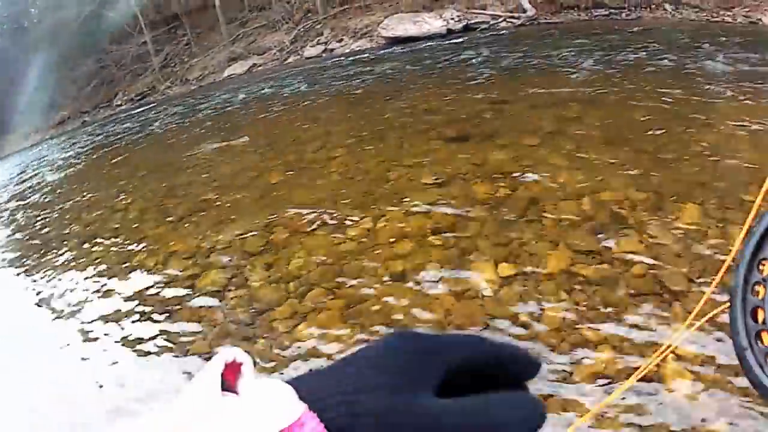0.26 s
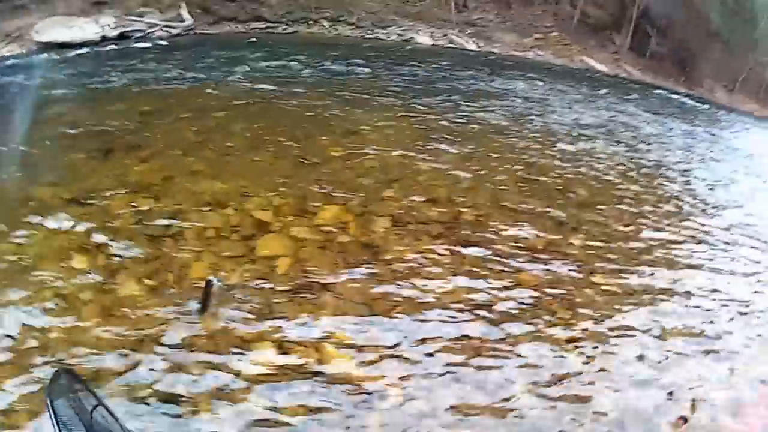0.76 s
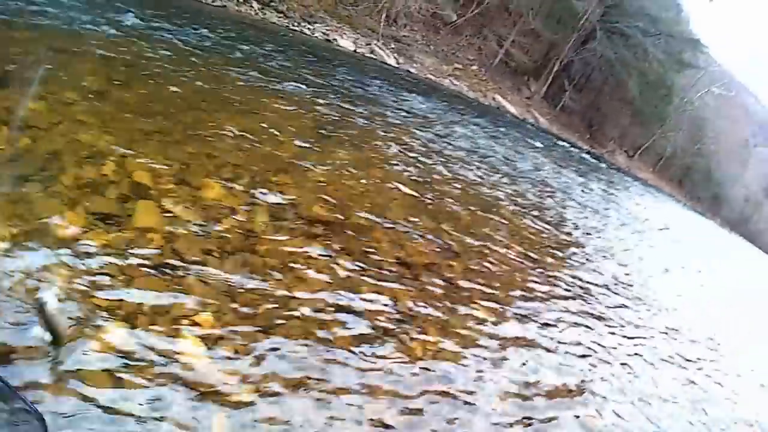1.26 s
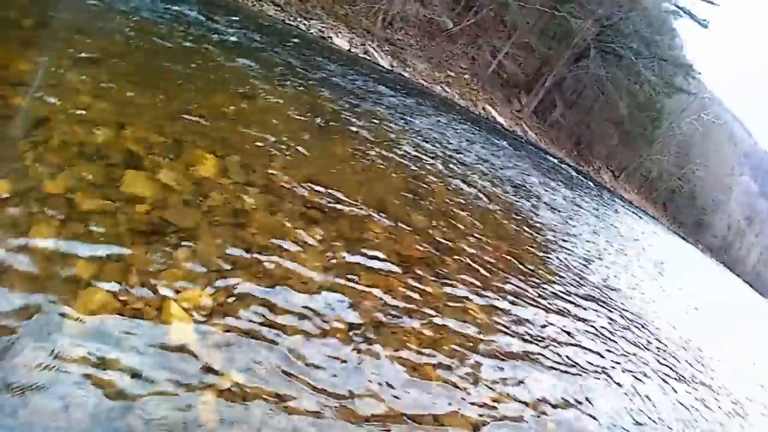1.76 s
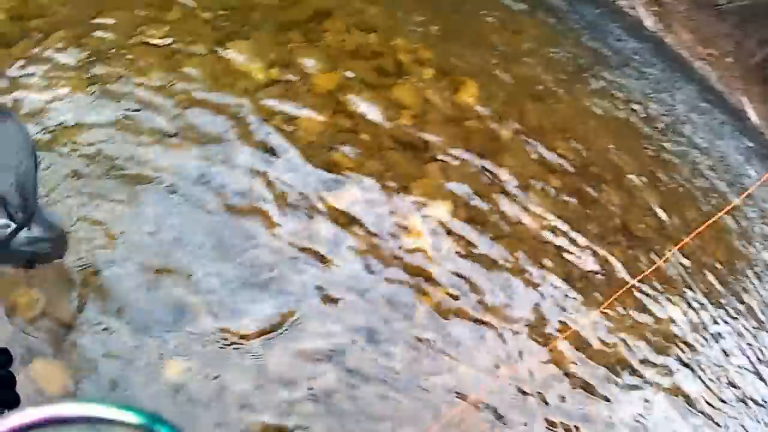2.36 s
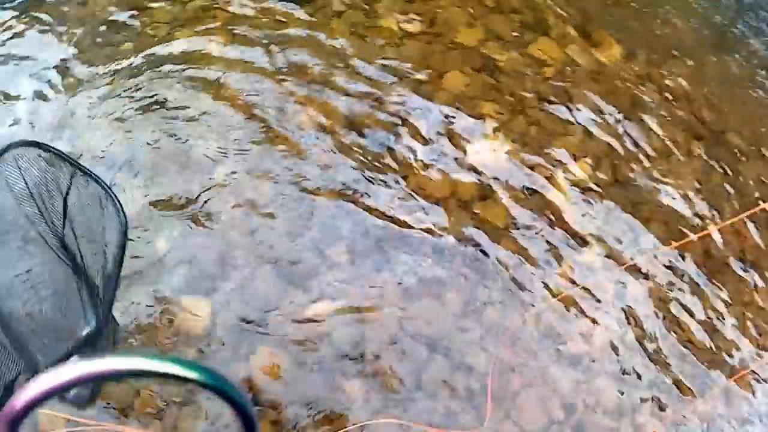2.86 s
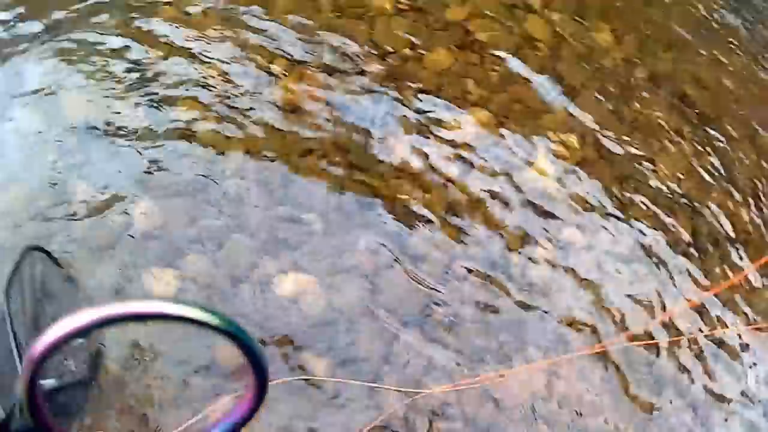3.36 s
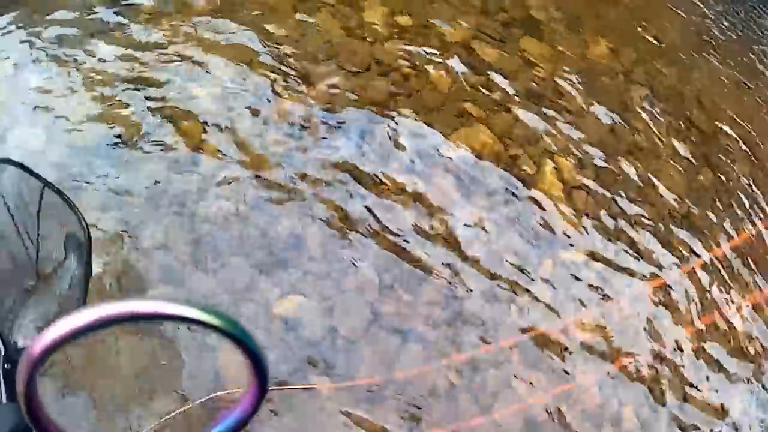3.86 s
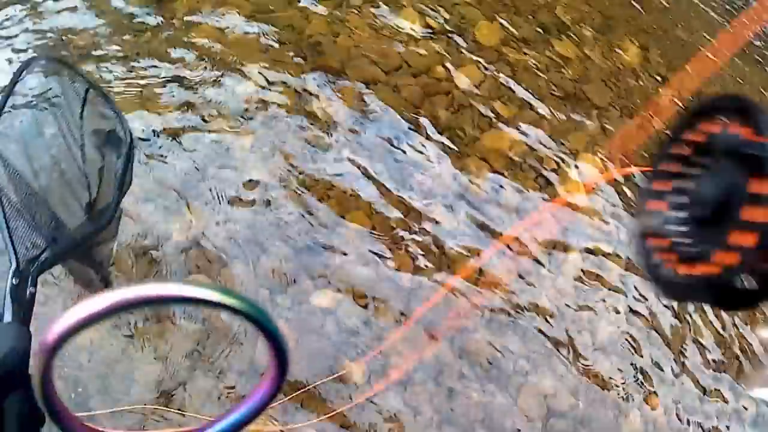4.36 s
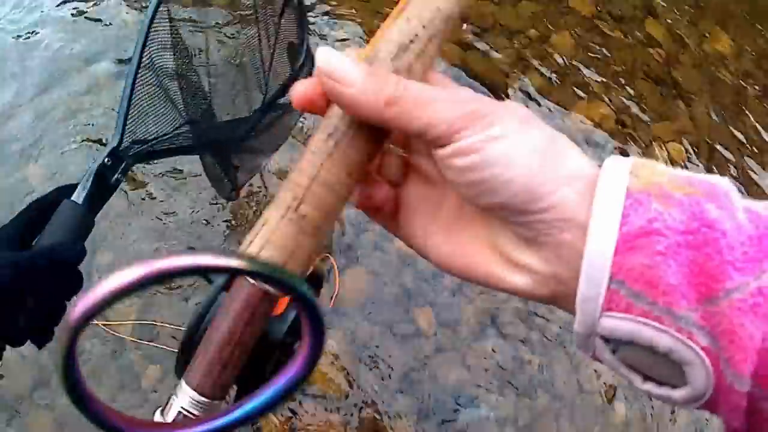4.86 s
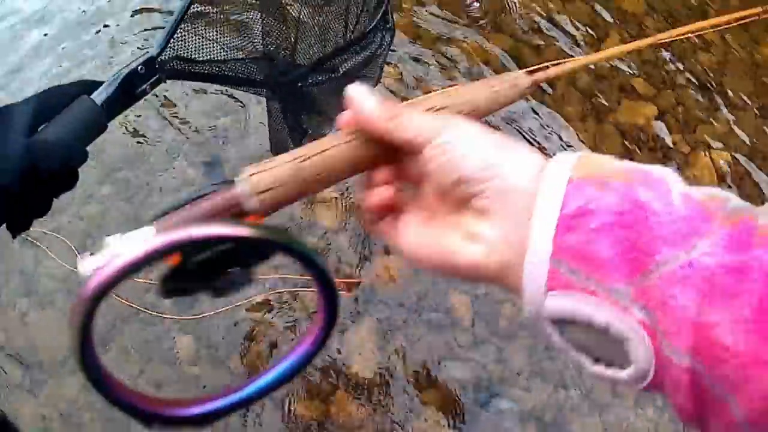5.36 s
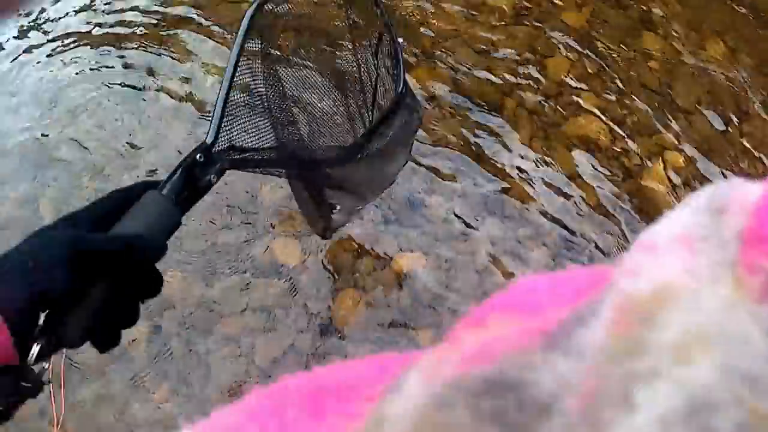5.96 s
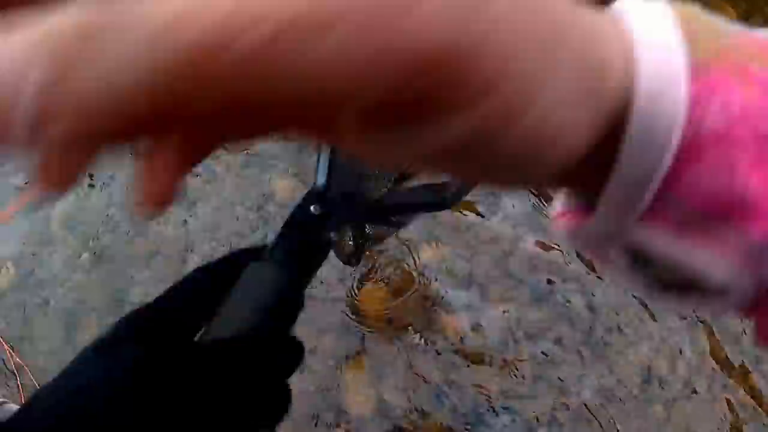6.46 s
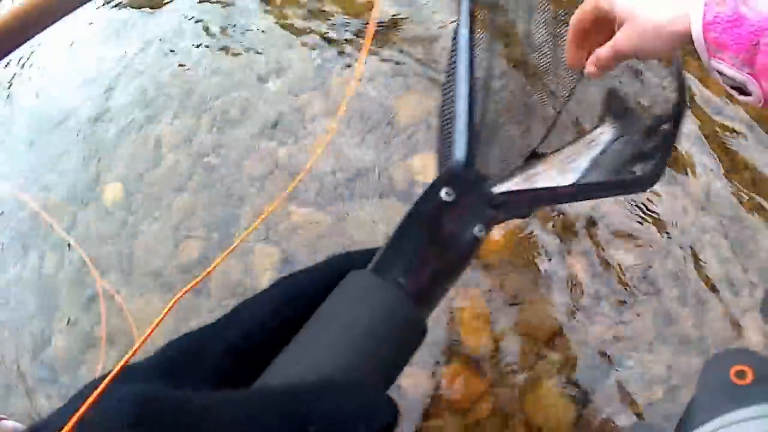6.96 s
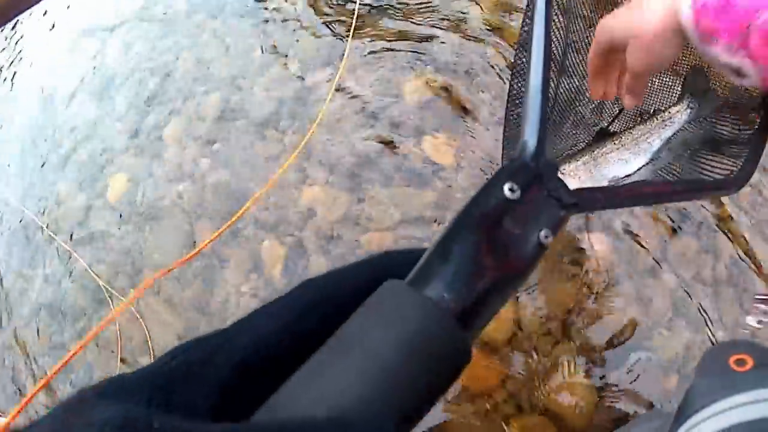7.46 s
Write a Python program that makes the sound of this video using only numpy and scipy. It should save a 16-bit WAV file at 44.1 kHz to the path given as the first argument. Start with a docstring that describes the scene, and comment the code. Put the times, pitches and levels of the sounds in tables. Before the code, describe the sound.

Muffled sleeve rustling and hard gear knocks against a body-worn microphone, growing louder late, over a faint, dull stream.

```python
"""Gear knocks and cloth rustles on a body-worn waterproof case as an angler nets a small fish.
Sleeves and wet net stick and slip in short strokes; rod, reel and zips tick and scrape. Both ring the
case's plastic modes. Body movement sways and shoves the case, giving rumble and low thuds.
Line zips faintly through the rod rings. A shallow stream is a dull wash behind it all."""
import sys
import numpy as np
from scipy import signal
from scipy.fft import rfft, irfft, next_fast_len
from scipy.io import wavfile
from scipy.ndimage import map_coordinates

SR = 44100
rng = np.random.default_rng(int(sys.argv[2]) if len(sys.argv) > 2 else 0)


def log_audio(samples):
    """Write samples as a 16-bit WAV file to the path given in sys.argv[1]."""
    # one column per channel
    frames = np.atleast_2d(samples).T
    # limit to full scale, then quantise
    limited = np.clip(frames, -1, 1)
    pcm = np.round(limited * 32767).astype(np.int16)
    wavfile.write(sys.argv[1], SR, pcm)


N = 339570

# Current heard through the case: (frequency [Hz], density [dB])
STREAM_SPECTRUM = [(25, 1.5), (80, -4), (130, -8), (300, -11.5), (450, -16.5), (1100, -21), (1550, -22.5),
                   (2000, -26), (3000, -30.5), (5000, -40.5), (6500, -45), (8000, -46), (15500, -57.5)]
# Sleeve and net strokes: (peak time [s], rise [s], fall [s], level [dB], brightness [dB], weight [dB])
CLOTH_STROKES = [(.02, .05, 0.063, -77.5, 2, 1.5), (.445, .025, .16, -68.5, 0.5, -6),
                 (.78, 0.126, 0.186, -62, -9, -2), (.96, 0.0884, .12, -51.5, -4, -4),
                 (1.19, 0.151, 0.0986, -53, 1, 1), (2.02, 0.078, 0.056, -69, -20, -7.5),
                 (2.32, 0.31, 0.27, -64, -4.5, -3.5), (2.59, 0.098, .06, -60, -2.5, -3.5),
                 (2.79, 0.1, .13, -62, 4, -3), (3.17, 0.1334, 0.067, -61.5, 16.5, 4.5),
                 (3.31, 0.091, 0.0632, -58, 12, -1), (4.66, 0.19, 0.21, -63, 8, 2.5),
                 (4.95, .12, 0.18, -73.5, 11.5, 6.5), (5.33, 0.093, 0.154, -69.5, 2.5, -4),
                 (5.48, .055, 0.22, -55.5, 7.5, 5), (5.68, 0.25, 0.39, -57, 12, 2.5),
                 (6.0, .17, 0.32, -48, 2, -1), (6.17, 0.091, 0.16, -43, -0.5, 1),
                 (6.5, .11, 0.061, -40, -3, 0.5), (6.609, 0.045, 0.081, -40.5, 11.5, -1),
                 (6.7, 0.04, 0.15, -51, -2.5, 1), (6.89, .1, 0.15, -64, -2, 0),
                 (7.24, 0.21, 0.088, -62, 5, 3)]
# Plastic case resonances: (frequency [Hz], width [Hz], gain [dB])
CASE_MODES = [(585, 190, 0), (1190, 367, 0.5), (1417, 325, 7.5), (1429, 359.2, 5.5), (2069, 420, -0.5),
              (2280, 460, -6.5), (2977, 200, 0.5), (3292, 260, 0.5), (3960, 290, -9), (4770, 480, -7),
              (5990, 460, -7.5), (6470, 330, -5.5), (9720, 270, -13.5), (10930, 460, -23),
              (13200, 690, -26), (14300, 640, -21)]
LID_MODES, WALL_MODES, TREBLE_MODES = CASE_MODES[:1], CASE_MODES[1:6], CASE_MODES[6:]
# Unpitched cloth swish: (frequency [Hz], density [dB])
SWISH_SPECTRUM = [(400, -23.5), (850, -6), (1100, -3.5), (1500, 0), (2000, -4.5), (2400, -11.5),
                  (3200, -27), (5000, -49)]
# Low scuff of dragging cloth: (frequency [Hz], density [dB])
SCUFF_SPECTRUM = [(90, -22), (170, 1.5), (300, 0.5), (430, -2), (590, -1.5), (760, -5.5), (1100, -10),
                  (2000, -47.5)]
# Swaying case: (frequency [Hz], density [dB])
RUMBLE_SPECTRUM = [(12, -1), (28, 0), (45, -7.5), (75, -11), (130, -16.5), (230, -25), (500, -68.5)]
# Gear on the case: (time [s], level [dB], hardness [dB], ring pitch [Hz]); hardness > 0 is a sharp click
GEAR_HITS = [(.547, -67, -18.5, 1370), (.622, -56.5, -14, 1364), (0.9467, -40, -6, 1380),
             (1.1744, -41.5, -5.5, 1500), (2.333, -59, -16, 1290), (2.822, -52.5, 1, 1940),
             (3.0378, -49.5, 2, 2010), (3.1554, -54, 1, 1620), (3.398, -60.5, 3, 1910),
             (3.6005, -58.5, -4, 1510), (3.659, -55, -5.5, 1470), (3.9641, -53, 1.5, 1430),
             (4.3276, -59, -5, 1570), (4.465, -55, 2, 1710), (4.616, -48, -1, 1515),
             (4.654, -49.5, 8, 1520), (5.008, -50.5, -6.5, 1585), (5.2778, -50, -3, 1630),
             (5.3164, -54.5, -6, 1580), (5.439, -50.5, -5, 1480), (5.5408, -47.5, -15.5, 1570),
             (5.5742, -52.5, -11, 1600), (5.7176, -33.5, -1, 1770), (5.7307, -42, 5, 1670),
             (6.1214, -22.5, 7, 1450), (6.1304, -24, -1, 1300), (6.3978, -43, -17.5, 1260),
             (6.4251, -22.5, -8, 1186), (6.4424, -28.5, -11.5, 1213), (6.4693, -30, -10, 1206),
             (6.4983, -25, 0, 1580), (6.53, -23.5, -4.5, 1430), (6.5374, -16, 9, 1150),
             (6.694, -33.5, -9, 1180), (6.7005, -32.5, -2.5, 1650), (6.752, -46, -7.5, 1600),
             (6.9073, -54, 11.5, 1600), (7.0868, -20.5, 12.5, 1540), (7.1626, -36, 8, 1760),
             (7.23, -49.5, 5, 1681)]
# Snap of a hard touch: (frequency [Hz], density [dB])
SNAP_SPECTRUM = [(1500, -19), (2500, -1.5), (3200, 5), (4000, 6), (5000, -8.5), (6500, -24.5), (9500, -20),
                 (14500, -18)]
# Gear dragging: (start [s], length [s], end level [dB], hardness [dB], ring pitch [Hz])
GEAR_SCRAPES = [(0.937, 0.019, -45, -3, 1500), (5.705, .014, -41, 8, 1660),
                (6.107, 0.0286, -29.5, 3.5, 1400), (6.488, 0.019, -33, -3, 1450),
                (7.045, .036, -35, 4.5, 1230), (7.149, .02, -38.5, 8, 1750), (7.224, 0.025, -52, 5, 1650)]
# Soft pushes on the case: (time [s], level [dB], nominal flex rate [Hz])
BODY_SHOVES = [(0.971, -34.5, 25.5), (1.147, -32.5, 50), (1.196, -27.5, 131), (1.217, -38.5, 40),
               (4.69, -33, 29.6), (5.484, -23, 25), (5.542, -34, 238), (5.577, -29.5, 89), (6.49, -24, 141),
               (6.526, -21.5, 48.6), (6.537, -13, 234.5), (6.5451, -26, 79.82), (6.583, -22.5, 39.56),
               (6.705, -22, 35.6), (6.75, -28.5, 100)]
# Line through the rod rings: (start [s], length [s], level [dB], top pitch [Hz])
LINE_PULLS = [(1.95, .17, -65.5, 1450), (2.45, 0.21, -66.5, 1300), (2.7, .17, -66.5, 1570)]
# Shell peaks and dips: (centre [Hz], half width [Hz], gain [dB])
SHELL_BANDS = [(145, 40, 1.5), (759, 70, -3), (2683, 100, -7), (2918, 110, 5.5), (5067, 94, 3.5),
               (5310, 130, -6.5)]

MOVING_FROM_S, MOVING_TO_S = .42, 7.35
MEDIUM_STROKE_DB = -61.5


def amp(db):
    return 10 ** (np.asarray(db) / 20)


def unit_rms(x):
    return x / np.sqrt(np.mean(x ** 2) + 1e-20)


def wobble(rate_hz):
    """Smooth random curve."""
    knots = rng.standard_normal(int(N * rate_hz / SR) + 4)
    return map_coordinates(knots, [np.arange(N) * rate_hz / SR])


def filtered(x, response):
    """Apply a complex frequency response."""
    size = next_fast_len(len(x) + 8192)
    return irfft(rfft(x, size) * response(np.fft.rfftfreq(size, 1 / SR)), size)[:len(x)]


def coloured(x, spectrum):
    """Shape x by a spectrum table; rms 1."""
    points_hz, db = np.transpose(spectrum)
    return unit_rms(filtered(x, lambda hz: amp(np.interp(np.log(hz + 1), np.log(points_hz), db))))


def resonance(hz, centre_hz, width_hz):
    """Causal response of one mode."""
    return 1j * hz * width_hz / (centre_hz ** 2 - hz ** 2 + 1j * hz * width_hz)


def add(track, time_s, sound):
    part = track[round(time_s * SR):][:len(sound)]
    part += sound[:len(part)]


def stream(level_db=-66.5):
    """Current muffled by the case, swelling slightly."""
    return amp(level_db + .6 * wobble(3.2)) * coloured(rng.standard_normal(N), STREAM_SPECTRUM)


def rubbing(rest_db=-89.5, brush_db=-74, brush_bright_db=4.5, drop_db=10.5, onset_s=.012, settle_s=.2):
    """Level, brightness, weight [dB] of strokes over light brushing; the loudest sets the colour."""
    t = np.arange(N) / SR
    moving = np.clip((t - MOVING_FROM_S) / onset_s, 0, 1)
    moving *= np.clip(1 - (t - MOVING_TO_S) / settle_s, 0, 1)
    power = amp(rest_db) ** 2 + (moving * amp(brush_db)) ** 2
    bright_sum, weight_sum = brush_bright_db * power, np.zeros(N)
    for peak_s, rise_s, fall_s, db, bright_db, weight_db in CLOTH_STROKES:
        from_peak = np.abs(t - peak_s) / np.where(t < peak_s, rise_s, fall_s)
        stroke_power = amp(db - drop_db * np.minimum(from_peak, 10) ** 1.22) ** 2
        power += stroke_power
        bright_sum += bright_db * stroke_power
        weight_sum += weight_db * stroke_power
    return 10 * np.log10(power), bright_sum / power, weight_sum / power


def friction(slips_per_s, spread_db, sliding):
    """Tiny uneven slips over smooth sliding noise."""
    slips = (rng.random(N) < slips_per_s / SR) * rng.choice([-1, 1], N)
    size_db = spread_db * np.minimum(rng.exponential(size=N), 4)
    return unit_rms(unit_rms(slips * amp(size_db)) + sliding * rng.standard_normal(N))


def case_ring(force, modes, band_hz):
    """Force rings case modes of alternating sign within one band; rms 1."""
    def ring(hz):
        return sum((-1) ** k * amp(db) * resonance(hz, centre_hz, width_hz)
                   for k, (centre_hz, width_hz, db) in enumerate(modes))
    b, a = signal.butter(3, band_hz, "bandpass", analog=True)
    return unit_rms(filtered(force, lambda hz: ring(hz) * signal.freqs(b, a, hz)[1]))


def rustle(rub_db, bright_db, weight_db):
    """Fabric catches and lets go, driving low scuff, wall modes and treble hiss."""
    slips = friction(slips_per_s=1400, spread_db=2.5, sliding=.8)
    slips *= amp(2.3 * wobble(130) + 1.8 * wobble(30))
    tilt = amp(bright_db + 2.8 * wobble(22))  # sliding shifts the balance of wall modes
    dull = case_ring(slips, WALL_MODES[:2], band_hz=(820, 1527))
    bright = case_ring(np.roll(slips, SR // 400), WALL_MODES[2:], band_hz=(1130, 2530))
    walls = (dull + tilt * bright) / np.sqrt(1 + tilt ** 2)
    swish = coloured(rng.standard_normal(N), SWISH_SPECTRUM) * amp(2 * wobble(90))
    middle = unit_rms(walls + .6 * swish)
    snags = friction(slips_per_s=180, spread_db=4, sliding=0)  # single threads catching
    treble = case_ring(slips + .19 * snags, TREBLE_MODES, band_hz=(2850, 15500))
    hiss = amp(-17 + 1.5 * wobble(45)) * treble
    scuff_db = -62 + .74 * (rub_db - MEDIUM_STROKE_DB) + weight_db
    return amp(rub_db + 1.56) * (middle + hiss) + amp(scuff_db) * coloured(slips, SCUFF_SPECTRUM)


def sway(rub_db, weight_db):
    """The case sways with each stroke; heavier pressure rumbles more."""
    sway_db = -51 + .58 * (rub_db - MEDIUM_STROKE_DB) + weight_db
    return amp(sway_db) * coloured(rng.standard_normal(N), RUMBLE_SPECTRUM)


def loaded(modes, detune=.012, damping=1.373):
    """A touching object detunes and damps the modes."""
    return [(hz * (1 + detune * rng.normal()), width_hz * damping, db + 1.5 * rng.normal())
            for hz, width_hz, db in modes]


def touch(level_db, hard_db, ring_hz, chatter_s=.0033):
    """An impulse with brief chatter rings the case; hardness trades knock for snap."""
    t = np.arange(SR // 16) / SR
    chatter_decay = np.exp(-(t / chatter_s) ** 2)
    force = .15 * rng.standard_normal(len(t)) * chatter_decay
    force[0] += 1
    lid = case_ring(force, loaded(LID_MODES), band_hz=(154, 839))
    thump = unit_rms(filtered(force, lambda hz: resonance(hz, 160, width_hz=190) ** 2))
    knock = unit_rms(lid + .5 * thump)
    # the struck spot favours one pitch
    spot_force = filtered(force, lambda hz: 1 + amp(6) * resonance(hz, ring_hz, width_hz=520))
    walls = case_ring(spot_force, loaded(WALL_MODES), band_hz=(975, 3250))
    treble = case_ring(force, loaded(TREBLE_MODES), band_hz=(2530, 16900))
    crack = coloured(rng.standard_normal(len(t)) * chatter_decay, SNAP_SPECTRUM)
    snap_db = level_db - 28 + .55 * hard_db
    snap = unit_rms(treble + np.interp(snap_db, [-71, -43], [.3, 1]) * crack)
    return amp(level_db - 25 - hard_db) * knock + amp(level_db - 12) * walls + amp(snap_db) * snap


def gear(rebound_s=.003, rebound_db=-7.5, ticks_per_s=2.5):
    """Rod, reel, net handle and zips hit the case and bounce once; faint ticks fall at random."""
    track = np.zeros(N)
    for time_s, db, hard_db, ring_hz in GEAR_HITS:
        hit = touch(db, hard_db, ring_hz)
        add(track, time_s, hit)
        flight_s = rebound_s * np.exp(.25 * rng.normal())
        add(track, time_s + flight_s, amp(rebound_db) * hit)
    span_s = MOVING_TO_S - MOVING_FROM_S
    for _ in range(round(ticks_per_s * span_s)):
        time_s = MOVING_FROM_S + span_s * rng.random()
        add(track, time_s, touch(-62.5 + 1.5 * rng.normal(), hard_db=0, ring_hz=1550))
    return track


def scrapes(catch_s=.006, swell_db=14.5):
    """Dragged gear catches in a quick, uneven run, louder as pressure builds."""
    track = np.zeros(N)
    for start_s, length_s, end_db, hard_db, ring_hz in GEAR_SCRAPES:
        for progress in np.linspace(0, 1, round(length_s / catch_s) + 1):
            jitter_s = .25 * catch_s * rng.normal()
            catch = touch(end_db - swell_db * (1 - progress), hard_db, ring_hz)
            add(track, start_s + progress * length_s + jitter_s, catch)
    return track


def shoves():
    """Each lean squeezes the case once and lets it spring back: a low thud."""
    track = np.zeros(N)
    t = np.arange(SR // 6) / SR
    for time_s, db, flex_hz in BODY_SHOVES:
        phase = 2 * np.pi * flex_hz * t / 1.15
        flex = phase ** 2 * (1 - phase / 3) * np.exp(-phase)
        add(track, time_s, amp(db + 9) * flex)
    return track


def line_zip(pitch_sag=.17, width_hz=140):
    """Line slides through the rod rings: narrow noise whose pitch and level follow its speed."""
    track = np.zeros(N)
    grain = unit_rms(filtered(rng.standard_normal(N), lambda hz: np.exp(-(hz / width_hz) ** 2)))
    for start_s, length_s, db, top_hz in LINE_PULLS:
        speed = np.sin(np.linspace(0, np.pi, round(length_s * SR)))
        pitch_hz = top_hz * (1 - pitch_sag * (1 - speed))
        phase = 2 * np.pi * np.cumsum(pitch_hz) / SR
        add(track, start_s, amp(db) * speed * np.sqrt(2) * np.sin(phase))
    return track * grain


def shell(x):
    """Contact sound crosses the shell to the microphone, gaining narrow peaks and dips."""
    def gain_db(hz):
        return sum(db * np.exp(-((hz - centre_hz) / half_width_hz) ** 4)
                   for centre_hz, half_width_hz, db in SHELL_BANDS)
    return filtered(x, lambda hz: amp(gain_db(hz)))


def scene():
    """Stream and line, plus contact sounds through the shell; one motion drives rustle and sway."""
    rub_db, bright_db, weight_db = rubbing()
    cloth = rustle(rub_db, bright_db, weight_db) + sway(rub_db, weight_db)
    return (stream() + line_zip() + shell(cloth + gear() + scrapes() + shoves()))[None]


def record(dry):
    """Sealed microphone port: deep treble notch, then a roll-off to the band limit."""
    def port(hz, notch_hz=7950, limit_hz=15750):
        notch_db = -17 * np.exp(-((hz - notch_hz) / 950) ** 4)
        rolloff_db = -14 * np.clip((hz - 14700) / 1000, 0, 1)
        return amp(notch_db + rolloff_db) * (hz < limit_hz)
    return filtered(dry[0], port)[None]


dry = scene()
out = record(dry)
log_audio(out)
```